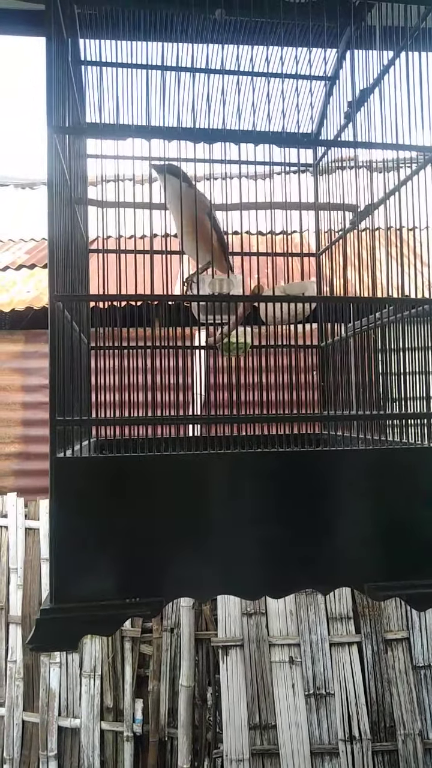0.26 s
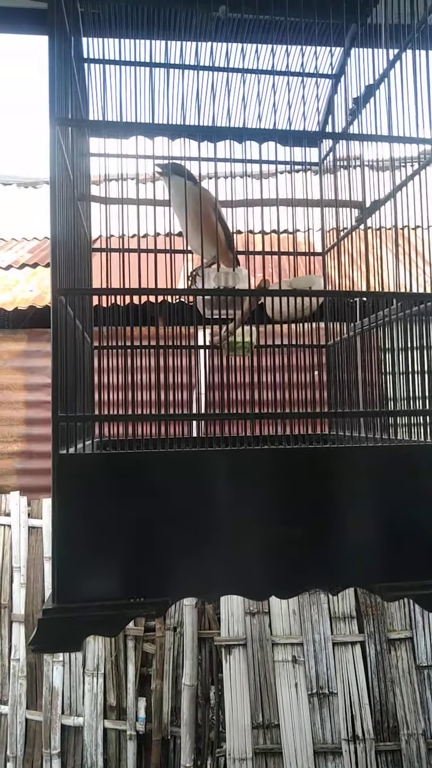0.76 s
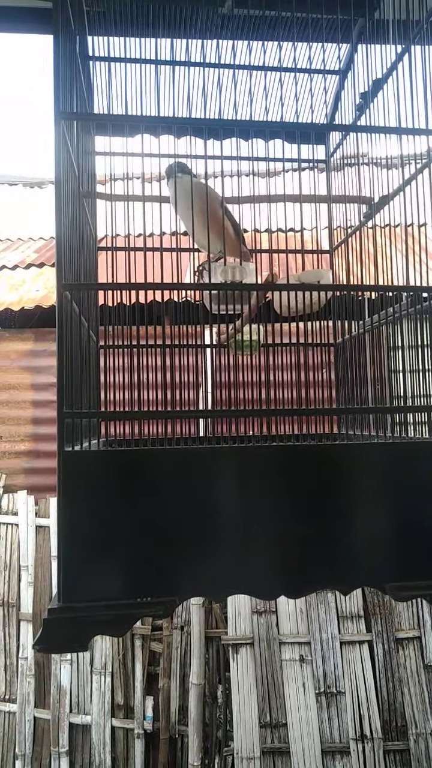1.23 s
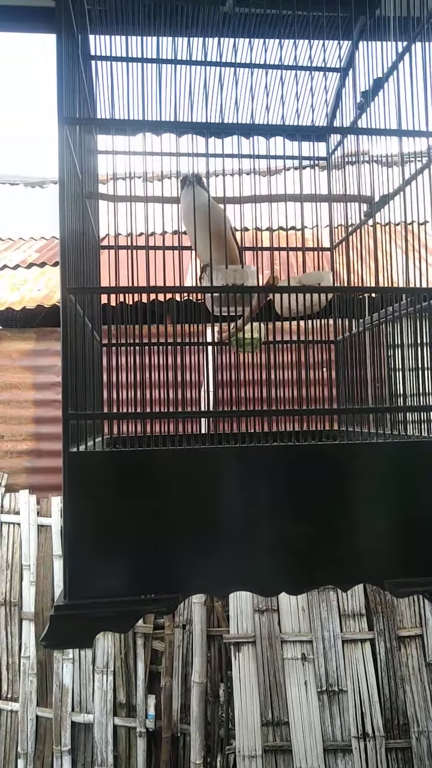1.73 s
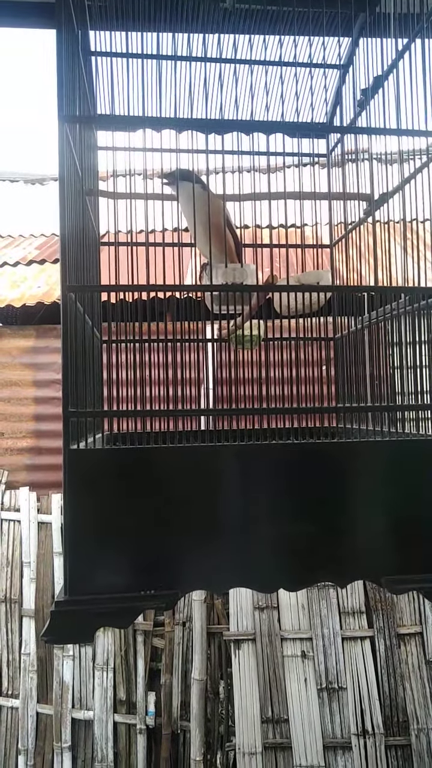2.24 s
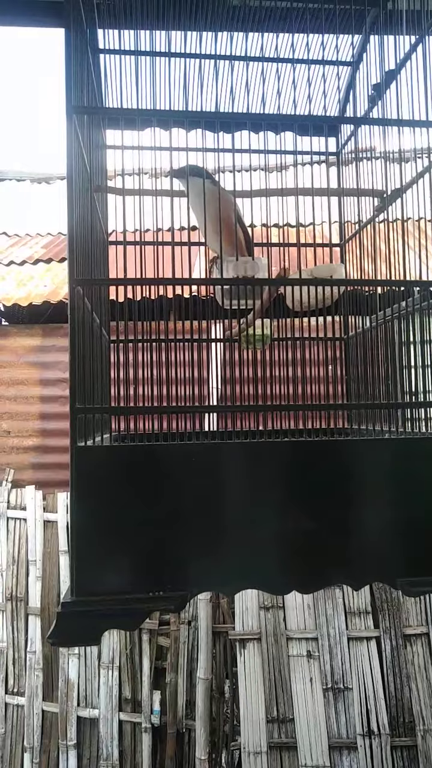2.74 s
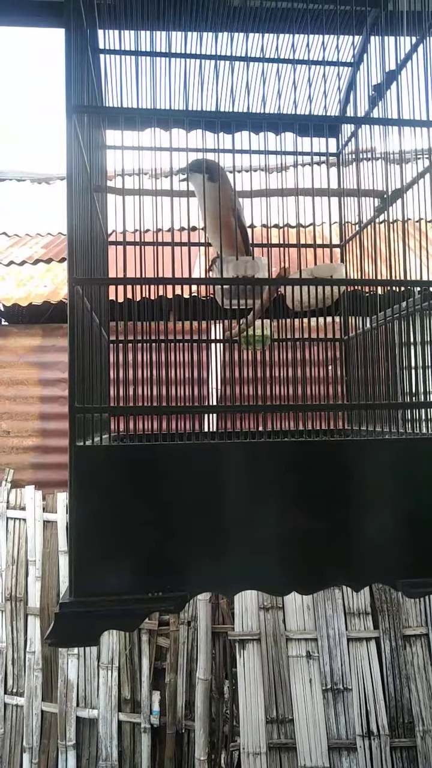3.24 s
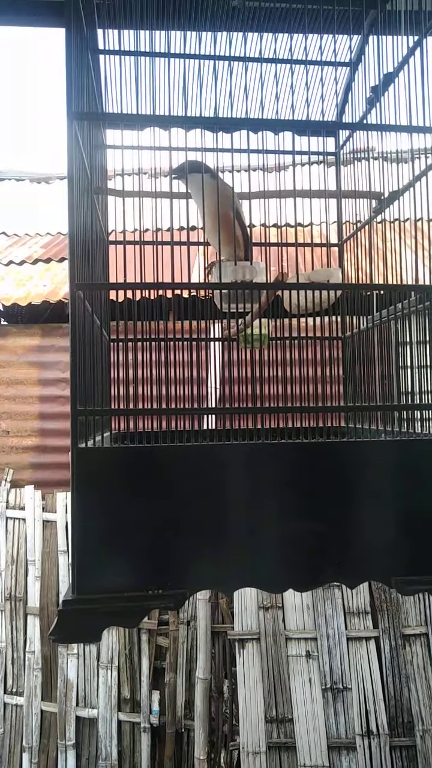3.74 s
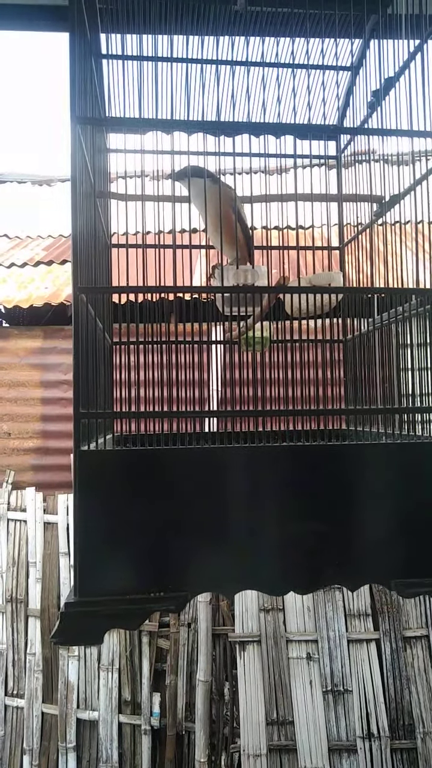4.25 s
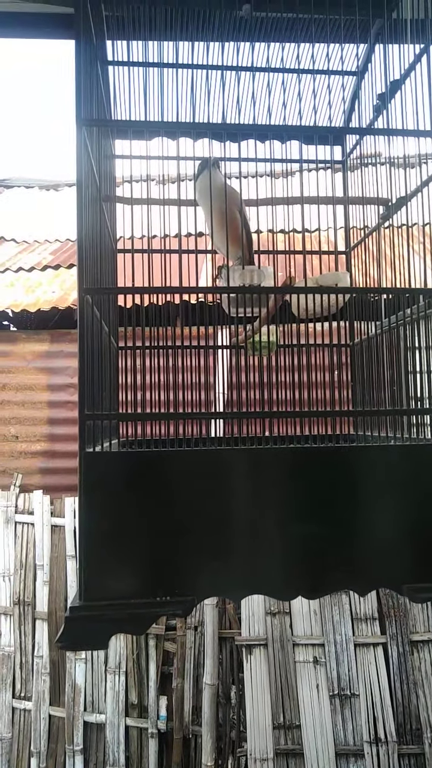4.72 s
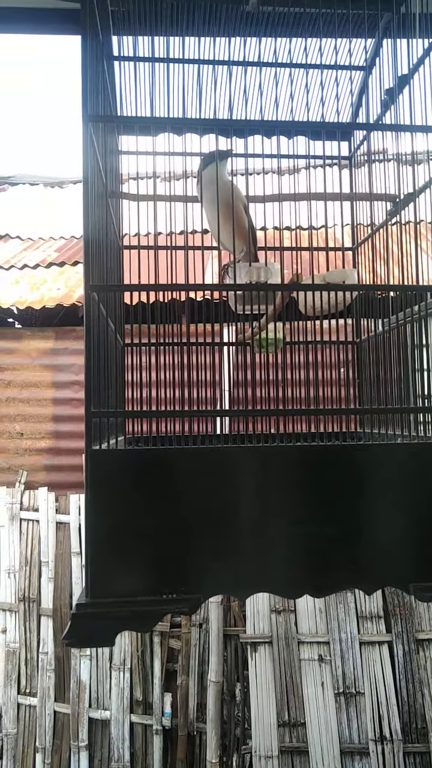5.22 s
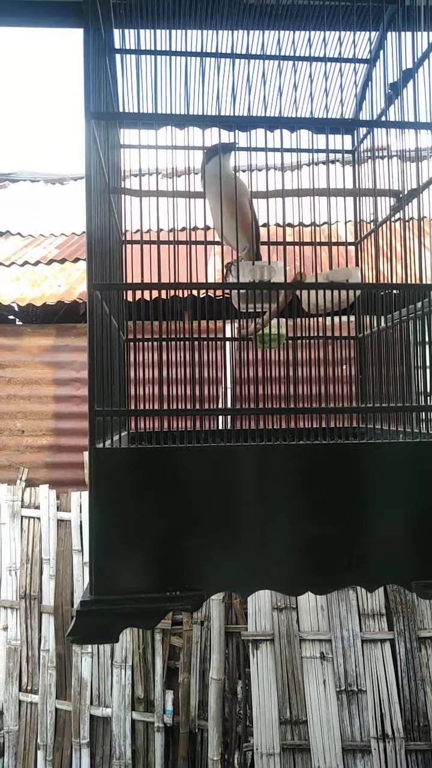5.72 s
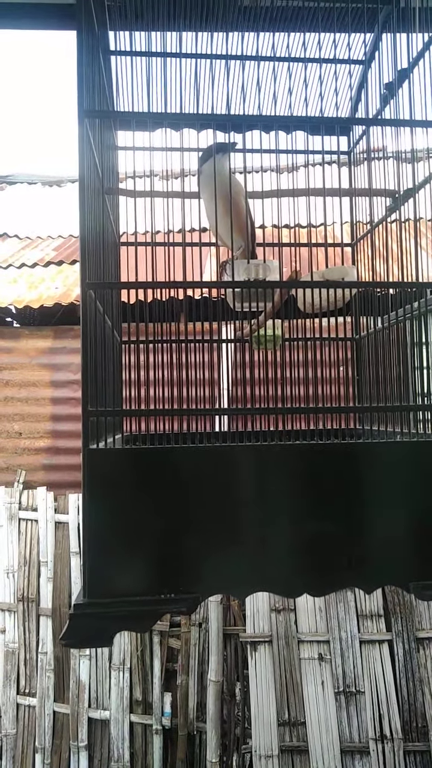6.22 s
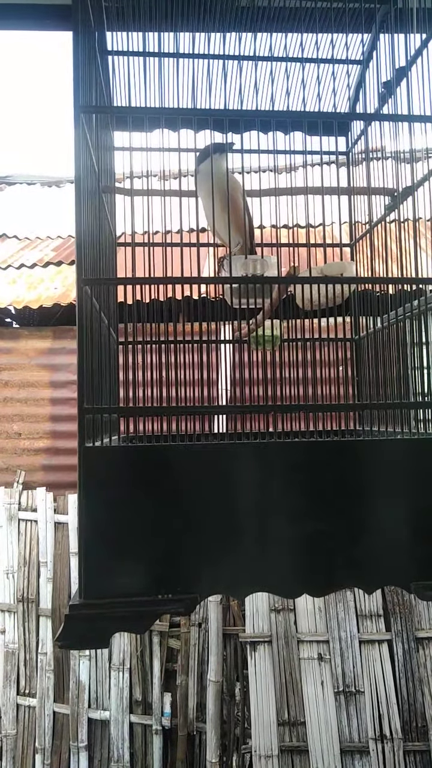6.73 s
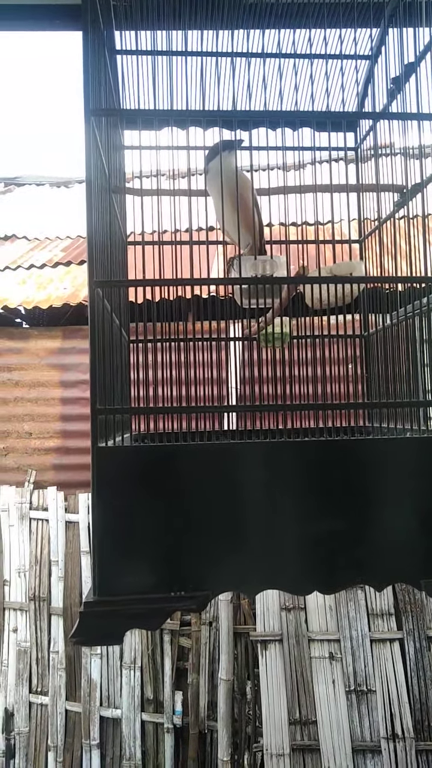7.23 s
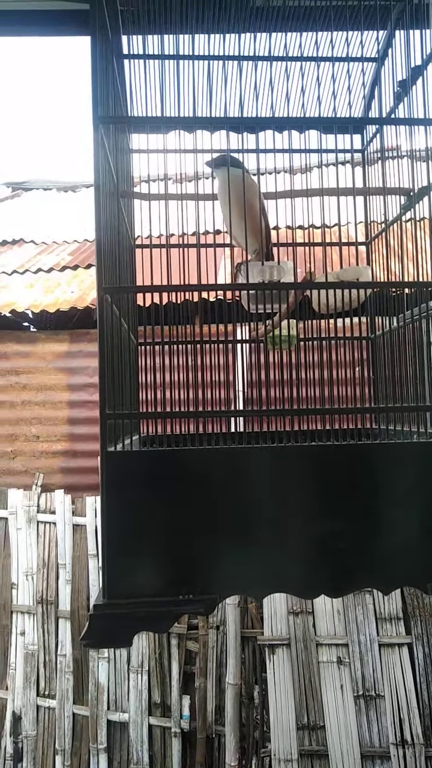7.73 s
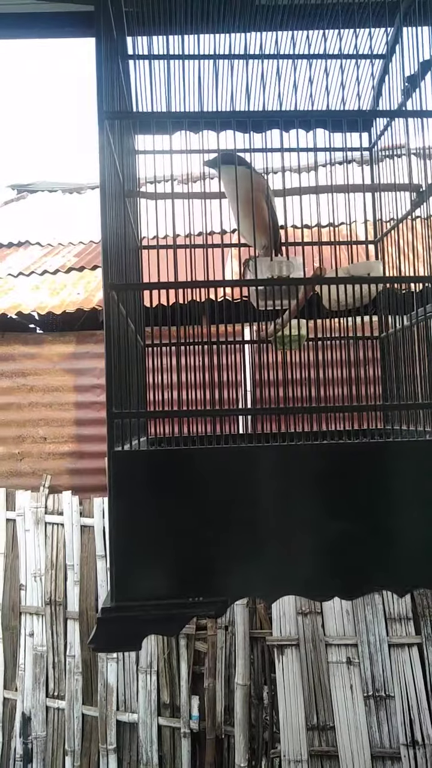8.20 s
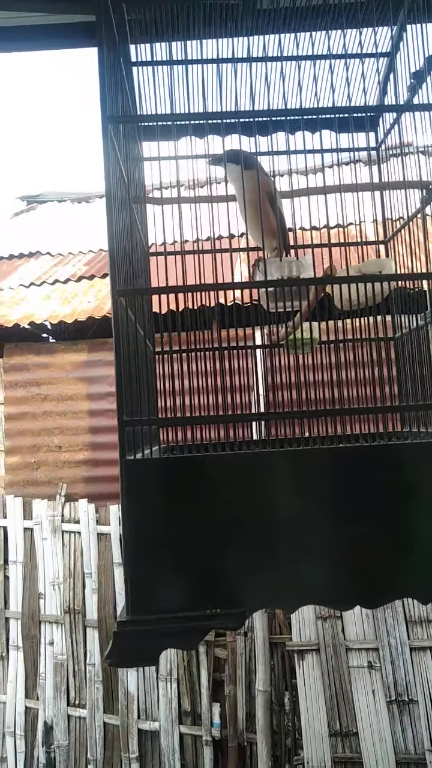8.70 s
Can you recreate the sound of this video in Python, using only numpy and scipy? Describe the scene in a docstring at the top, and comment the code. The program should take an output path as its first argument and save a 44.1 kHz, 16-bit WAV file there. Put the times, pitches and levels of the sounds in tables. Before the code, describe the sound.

A nearby caged songbird sings sharp chips and slurs, then a second bird chatters harshly further off, with a distant rooster and faint hum.

```python
"""Two birds in a yard

A caged shrike close by sings sharp chips and two-voiced slurs, the two sides of its syrinx acting as
coupled oscillators. A second bird further off answers with harsh chatter and a long whistle, heard
mostly by reflection from the walls. A rooster crows in the distance and faint fowl call; soft rustles
come and go, and a low hum lies under it all."""
import sys
import numpy as np
from scipy import signal
from scipy.fft import rfft, irfft
from scipy.io import wavfile
from scipy.ndimage import map_coordinates

SR = 44100
rng = np.random.default_rng(int(sys.argv[2]) if len(sys.argv) > 2 else 0)


def dump(signal):
    """Clip the signal to [-1, 1] and save it as 16-bit WAV at the path in sys.argv[1]."""
    limited = np.clip(np.atleast_2d(signal).T, -1, 1)
    pcm = np.round(limited * 32767).astype(np.int16)
    wavfile.write(sys.argv[1], SR, pcm)


N = 395136
T = np.arange(N) / SR

# Notes of each bird: t/s, relative level/dB, step per harmonic/dB, syllable
SHRIKE = [ (.124, -10.5, 0, "tseeu"), (.858, -14, -3, "pip-chip"), (1.118, -12.5, -3, "pip-chip"),
          (1.272, -17.5, -2.5, "tik-tuk"), (1.404, -30, -8, "churr"), (1.565, -23, -7.5, "wree"),
          (1.708, -23.5, -7.5, "wree"), (1.883, -23.5, -8.5, "wree"), (2.135, -11.5, -1.5, "pip-chip"),
          (2.279, -18, -2, "tik-tuk"), (2.485, -20.5, -12, "wee"), (2.683, -24.5, -12, "wree"),
          (3.035, -10.5, -2, "pip-chip"), (3.308, -13, -2.5, "pip-chip"), (3.466, -21, -2, "tik-tuk"),
          (3.692, -19.5, -12.5, "wee"), (3.883, -23.5, -11.5, "wree"), (8.569, -14, -7, "pip-chip"), ]
NEIGHBOUR = [(4.12, -46, -24, "rise"), (4.535, -37.5, -7.5, "rise"), (8.303, -36, -4.5, "tchik"),
             (8.372, -45, -3.5, "lilt"), (8.438, -23.5, -6.5, "whistle")]
# Strokes of the syrinx in each syllable; overlapping strokes come from its two sides:
# delay/s, length/s, start f/Hz, glide from f/Hz, glide to f/Hz, end f/Hz, relative level/dB, swell/dB
SHAPE = { "tseeu": [(0, .031, 2830, 2950, 3780, 4450, -17, 18),
         (.03, .046, 5410, 6420, 7106, 5070, -1, -4.5), (.048, .085, 6400, 3770, 4870, 4680, -15, 2.5)],
         "pip-chip": [(0, 0.031, 2390, 2368, 2437, 3500, -12, 9),
         (.049, 0.012, 4880, 4500, 3630, 3600, -5.5, 0.5), (.056, .022, 3590, 2950, 2768, 2780, 0.5, -4.5)],
         "tik-tuk": [(0, .024, 2834, 2646, 3053, 4400, 0, 5),
         (.042, .022, 5600, 4247, 2870, 3050, -1.5, 4.5)],
         "churr": [(0, .113, 2750, 3200, 3240, 4450, 9.5, -3),
         (0, 0.16, 3600, 5500, 6000, 6900, -0.5, -19)], "wree": [(0, .083, 2680, 3187, 4738, 5160, 1, -1),
         (0, .083, 3600, 5520, 5943, 6820, -3, 6)], "wee": [(0, .127, 2630, 3263, 3852, 4720, 4, -5.5),
         (0, .11, 3990, 4764, 4900, 5580, -7, -15.5)],
         "chak": [(0.00052, .038, 3500, 2250, 1560, 1516, 2, 4)],
         "tchik": [(0, 0.02106, 2216, 1952, 1679, 1590, 2, 3.5),
         (0, 0.0205, 4516, 3860, 3340, 3290, 1.5, 6)], "lilt": [(0, .044, 2205, 2350, 3100, 3100, 9.5, 13)],
         "rise": [(0, .087, 1500, 1850, 3050, 3340, 3, 5.5)],
         "scratch": [(0.0034, .021, 4200, 2700, 2500, 2250, 1, 17)],
         "whistle": [(0, .225, 3390, 4584, 4680, 3960, -2, 4),
         (.02, 0.22, 6700, 7600, 7560, 6930, -6.5, -4)], }
# Extra frequency modulation of the trilled syllables: syllable -> depth as a share of the pitch
TRILL_DEPTH = {"wree": .025, "churr": 0.015, "whistle": 0.013}
# Resonances of each bird's throat and beak: f/Hz, gain/dB
SHRIKE_TRACT = [(1200, -54), (2300, -7), (3000, -16.5), (4000, -4), (5000, -5), (5900, -2.5), (6700, -7.5),
                (7600, -15.5), (9500, -22), (12000, -20), (15500, -45.5)]
NEIGHBOUR_TRACT = [(900, -37), (1500, -16.5), (2000, -3), (3000, -1), (4100, 4), (5200, -4), (6200, -5.5),
                   (8000, -13.5), (9600, -25), (11700, -11), (15500, -40)]
# Runs of chaks: t/s, count, stretch of the rhythm, relative level/dB, share of dullness kept per chak
CHAK_RUNS = [(5.092, 5, 0.96, -28, 0.16), (5.995, 6, 0.96, -26.5, 0.31), (7.428, 5, 0.85, -29, 0.32)]
# Double tchiks that close the runs: t/s, relative level/dB
DOUBLE_TCHIKS = [(5.748, -29.5), (6.795, -29), (7.049, -32.5), (8.044, -31)]
# Syllables of the crow, and the clearer fowl calls: t/s, length/s, f/Hz, relative level/dB
CROW_SYLLABLES = [(-.06, 0.127, 838, -39.5), (0.151, 0.324, 843, -36), (0.598, .84, 785.4, -42.5)]
FOWL_CALLS = [(2.249, .5, 1113, -66.5), (2.329, 0.26, 1680, -66), (3.092, 0.4, 948, -58.5),
              (3.377, 0.52, 968.5, -56.5), (3.42, .6, 640, -60), (4.024, 0.14, 903, -56.5),
              (4.531, 0.27, 602.5, -50.5), (4.566, 0.27, 1105, -57.5), (5.076, 0.21, 956, -57),
              (5.575, 0.25, 942, -64), (5.593, 0.18, 699, -66.5), (6.932, 0.083, 754, -50),
              (7.416, .25, 1148, -56), (7.531, 0.25, 806, -55), (8.313, 0.12, 669, -54),
              (8.55, .5, 1004, -63.5)]
# Swells of rustling: t/s, half width/s, level/dB
RUSTLE_SWELLS = [(0.155, 0.11, -53), (1.524, 0.058, -51), (2.407, .1, -65.5), (3.498, 0.14, -60),
                 (5.473, 0.063, -53), (7.71, 0.026, -60)]
# Tones of the hum: f/Hz, level/dB, swell t/s, swell/dB
HUM_LINES = [(70.3, -53.5, 7.05, 6), (150.6, -56, 6.7, 10.5)]
# Noise spectra of the rumble and of still air: f/Hz, relative level/dB
RUMBLE_SPECTRUM = [(25, -7.5), (65, 7), (100, 7), (160, -1), (230, -5), (330, -27), (800, -53.5),
                   (2000, -57.5)]
AIR_SPECTRUM = [(400, 0), (1000, -2), (3000, -12), (10000, -17)]


def shrike():
    """Near a source the direct sound dominates the quick cage reflections and the yard's reverberation."""
    voice = song(SHRIKE, SHRIKE_TRACT,
                 jitter=.011, hoarse=.21, warble=.0059, warble_hz=118.4, coupling=.17)
    cage = echoes(voice, t60=.14, treble_t60=.087, onset_s=.0011)
    yard = echoes(voice, t60=.62, treble_t60=.36, onset_s=.0071)
    return voice + undb(-10) * cage + undb(-14) * yard


def song(notes, tract, **voice):
    """Source and filter: the syrinx supplies harmonics, and the throat and beak weight them."""
    track = np.zeros(N)
    for s, db, step_db, syllable in notes:
        add(track, s, undb(db) * syrinx(min(step_db, 0), syllable, **voice))
    return colour(track, tract)


def syrinx(step_db, syllable, jitter, hoarse, warble, warble_hz, coupling):
    """Coupled oscillators: each side glides along its own pitch and modulates the phase of the other."""
    strokes = SHAPE[syllable]
    size = int(max(delay + length for delay, length, *_ in strokes) * SR)
    attack_share, release_s = .081, .0016
    warble_depth = warble + TRILL_DEPTH.get(syllable, 0)
    # a harder push gives stronger overtones and makes the membranes beat unevenly
    roughness = hoarse * undb(step_db)
    sides = []
    for delay, length, *glide in strokes:
        t = T[:size] - delay
        hz, db = stroke(t, length, *glide)
        quiver = warble_depth * np.sin(turn(warble_hz * (1 + .2 * wander(63.5, size))))
        waver = .01 * wander(45.3, size)
        hz = hz * (1 + quiver + waver + jitter * wander(1000, size))
        gate = np.clip(np.minimum(t / (attack_share * length), (length - t) / release_s), 0, 1)
        gain = gate * undb(db + 2 * wander(250, size))
        sides.append((hz, turn(hz) + roughness * wander(2200, size), gain))
    sound = np.zeros(size)
    for hz, phase, gain in sides:
        pulled = phase + coupling * sum(g * np.sin(phase - other) for _, other, g in sides)
        for k in range(1, 9):
            sound += gain * undb((k - 1) * step_db) * np.sin(k * pulled) * (k * hz < SR / 2)
    return sound


def stroke(t, length, start_hz, from_hz, to_hz, end_hz, level_db, swell_db):
    """A linear glide between two weaker exponential transients: the pitch settles, glides, flicks off."""
    settle_s, flick_share = .006, .1
    share = np.clip(t / length, 0, 1)
    settle = np.exp(-share * length / settle_s)
    flick = np.exp((share - 1) / flick_share)
    glide_hz = from_hz + (to_hz - from_hz) * share
    hz = glide_hz + (start_hz - from_hz) * settle + (end_hz - to_hz) * flick
    db = level_db + swell_db * (share - .5) - 2.5 * settle - 6 * flick
    return hz, db


def neighbour():
    """Scattering: the walls return more of the second bird's hoarse voice than arrives directly."""
    voice = song(NEIGHBOUR + chatter(), NEIGHBOUR_TRACT,
                 jitter=.026, hoarse=.72, warble=.025, warble_hz=188.8, coupling=.11)
    walls = echoes(voice, t60=.15, treble_t60=.22, onset_s=.0018)
    yard = echoes(voice, t60=.65, treble_t60=.6, onset_s=.019)
    return undb(-13) * voice + undb(-1.5) * walls + undb(-9) * yard


def chatter():
    """The second bird's runs of notes relax geometrically from quick and dull to slow and harsh."""
    first_gap_s, last_gap_s = .111, .153
    first_step_db, last_step_db = -18, .54
    notes = []
    for s, count, stretch, db, dullness in CHAK_RUNS:
        for k in range(count):
            step_db = last_step_db + (first_step_db - last_step_db) * dullness ** k
            chak_db = db - .5 * k - 2.5 * (k == 0)  # the run opens softly, then tires
            notes.append((s, chak_db, step_db, "chak"))
            if k >= 2:  # later chaks get a rising lead-in
                notes.append((s - .034, db - 14, -6.5, "lilt"))
            s += stretch * (last_gap_s + (first_gap_s - last_gap_s) * .42 ** k)
    for s, db in DOUBLE_TCHIKS:
        notes += [(s, db, -3, "tchik"), (s + .042, db + 1, -3, "tchik")]
    fading_scratches = [(7.186 + .058 * k, -43 - 1.5 * k, 0, "scratch") for k in range(4)]
    return notes + fading_scratches


def rooster():
    """A harmonic voice with a dominant octave, blurred by reverberation; syllables fade and droop."""
    attack_s, release_s, droop_s, fade_db = .026, .11, .13, -7
    crow = np.zeros(N)
    for s, length, hz, db in CROW_SYLLABLES:
        size = int(length * SR)
        t = T[:size]
        droop = .21 * length * np.exp((t - length) / droop_s)
        phase = turn(hz * (1 - droop + .014 * wander(150, size)))
        gate = np.clip(np.minimum(t / attack_s, (length - t) / release_s), 0, 1)
        tone = undb(-6.5) * np.sin(phase) + np.sin(2 * phase) + undb(-30) * np.sin(3 * phase)
        add(crow, s, gate * undb(db + fade_db * t / length + 2.2 * wander(17.5, size)) * tone)
    # the voice breaks into a rasp as the long last syllable starts
    rasp = wander(300) * np.sin(turn(np.full(N, 1350)))
    rasp += undb(-10.5) * wander(300) * np.sin(turn(np.full(N, 2250)))
    crow += undb(-40.5) * bump(.66, .088) * rasp
    return undb(1.5) * crow + undb(-7) * house_echoes(crow)


def fowl():
    """Random modulation of pitch and level makes the calls from other yards quaver; houses echo them."""
    faint_per_s, centre_hz, spread_octaves = 7, 991, .65
    faint = []
    for slot_s in np.arange(0, N / SR, 1 / faint_per_s):
        s = slot_s + rng.random() / faint_per_s
        hz = centre_hz * 2 ** (spread_octaves * rng.uniform(-1, 1))
        faint.append((s, .18, hz, -68))
    calls = np.zeros(N)
    for s, length, hz, db in FOWL_CALLS + faint:
        size = int(length * SR)
        pitch = hz * (1 + .061 * wander(16, size) + .04 * wander(260, size))
        envelope = undb(db + 4.7 * wander(20, size)) * np.sqrt(np.hanning(size))
        add(calls, s, envelope * np.sin(turn(pitch)))
    return undb(4) * calls + house_echoes(calls)


def rustles():
    """Amplitude-modulated dull noise, as of feathers when the shrike shifts on its perch."""
    swell = sum(undb(db) * bump(s, width) for s, width, db in RUSTLE_SWELLS)
    return swell * coloured_noise([(150, -14.5), (550, -.5), (2500, -34)])


def hum():
    """Two wavering spectral lines, like a far motor, on a continuum of rumble and still air."""
    rumble = undb(-50.5 + 5 * bump(7.05, .085)) * coloured_noise(RUMBLE_SPECTRUM)
    tones = np.zeros(N)
    for hz, db, s, swell_db in HUM_LINES:
        gain = undb(db + swell_db * bump(s, .28) + 2 * wander(1.6))
        tones += gain * np.sin(turn(hz * (1 + .02 * wander(6.4))))
    air = undb(-73) * coloured_noise(AIR_SPECTRUM)
    return rumble + tones + air


def house_echoes(x):
    """Reverberation among the houses is long and dull, since its treble decays first."""
    return echoes(x, t60=.64, treble_t60=.1, onset_s=.009)


def echoes(x, t60, treble_t60, onset_s):
    """Diffuse reflection off walls and tin roofs: convolution with noise decaying in two bands."""
    t = T[:SR]
    crossover_hz = 7500
    noise = rng.standard_normal(SR)
    low = signal.sosfilt(signal.butter(4, crossover_hz, fs=SR, output="sos"), noise)
    high = signal.sosfilt(signal.butter(4, crossover_hz, "high", fs=SR, output="sos"), noise)
    tail = low * undb(-60 * t / t60) + high * undb(-60 * t / treble_t60)
    response = unit(tail * (1 - np.exp(-t / onset_s))) / np.sqrt(SR)
    return signal.fftconvolve(x, response)[:N]


def colour(x, points):
    """Filtering as multiplication of the spectrum by a curve through points (f/Hz, gain/dB)."""
    hz, db = np.transpose(points)
    f = np.maximum(np.fft.rfftfreq(2 * N, 1 / SR), 1)
    gain = undb(np.interp(np.log(f), np.log(hz), db))
    return irfft(rfft(x, 2 * N) * gain)[:N]


def coloured_noise(points):
    """White noise takes on the spectrum of its filter; the rms is 1."""
    return unit(colour(rng.standard_normal(N), points))


def wander(rate, size=N):
    """A smooth random process with spread near 1, changing rate times a second."""
    steps = np.arange(size) * rate / SR
    return map_coordinates(rng.standard_normal(int(steps[-1]) + 3), [steps], order=3, mode="nearest")


def bump(s, width):
    """A Gaussian envelope that peaks at time s."""
    return np.exp(-((T - s) / width) ** 2)


def turn(hz):
    """Phase is the time integral of frequency."""
    return 2 * np.pi * np.cumsum(hz) / SR


def add(track, s, sound):
    """Superpose a sound on a track at time s, or at 0 if s is negative."""
    start = max(int(s * SR), 0)
    track[start:start + len(sound)] += sound[:max(N - start, 0)]


def undb(db):
    """Decibels to amplitude ratio."""
    return 10 ** (np.asarray(db) / 20)


def unit(x):
    """Normalise to rms 1."""
    return x / np.sqrt(np.mean(x ** 2) + 1e-20)


def scene():
    """Superposition: the pressures of all sources add in one channel."""
    return (shrike() + neighbour() + rooster() + fowl() + rustles() + hum())[None]


def record(dry):
    """Band limiting: a steep low-pass filter removes the highest treble."""
    cutoff_hz = 15600
    return signal.sosfilt(signal.ellip(8, .2, 70, cutoff_hz, fs=SR, output="sos"), dry)


dry = scene()
out = record(dry)
dump(out)
```